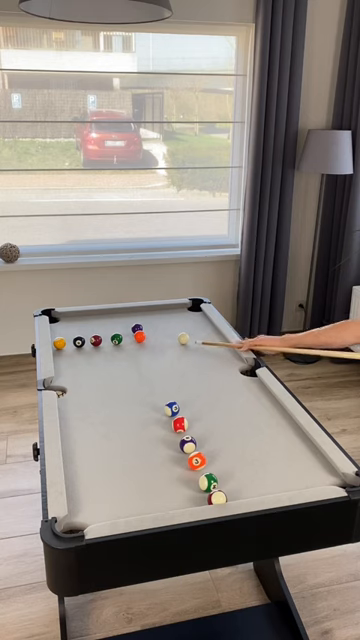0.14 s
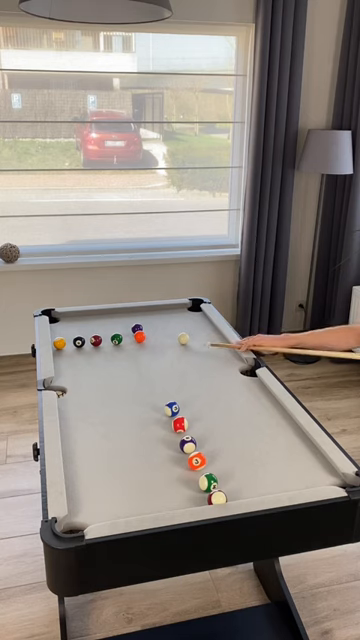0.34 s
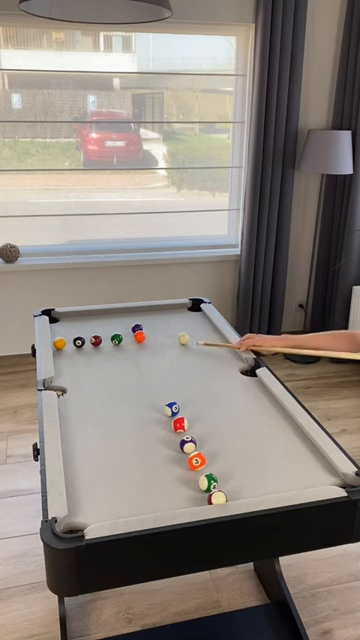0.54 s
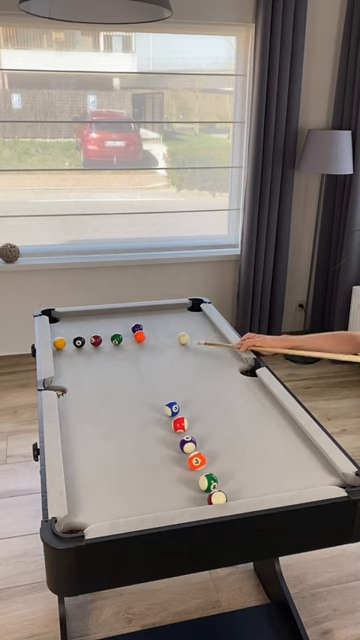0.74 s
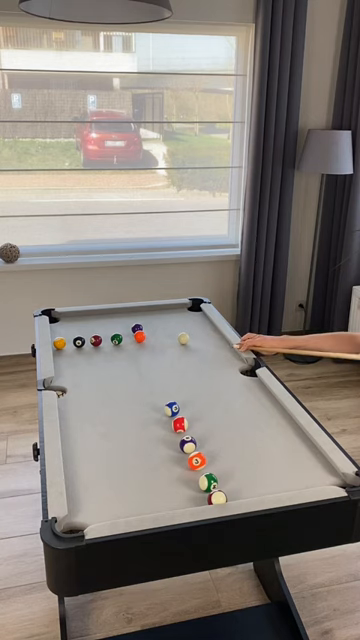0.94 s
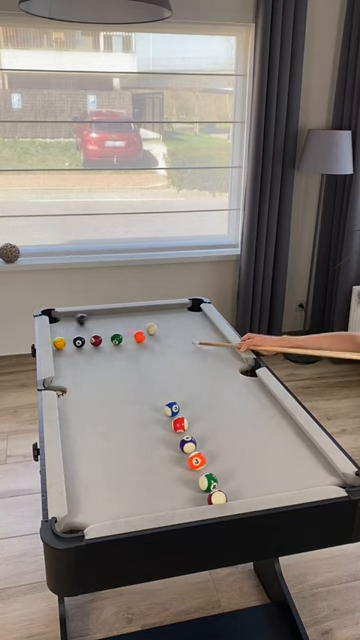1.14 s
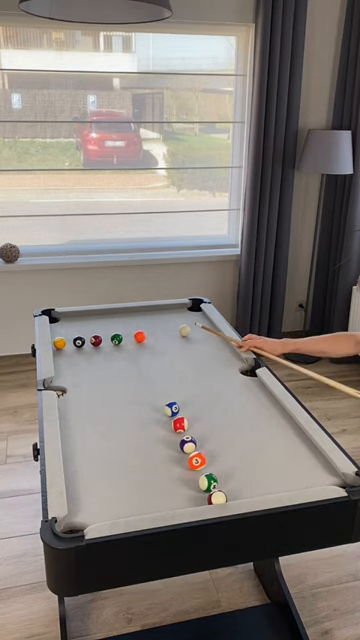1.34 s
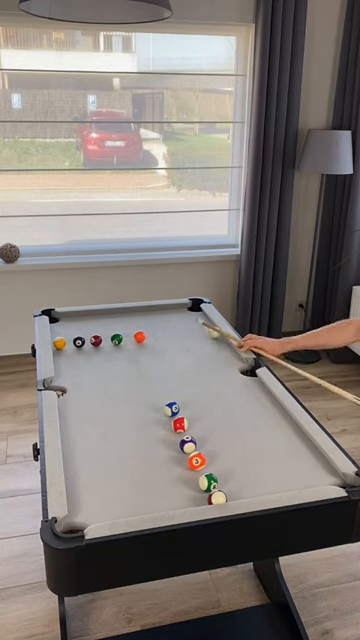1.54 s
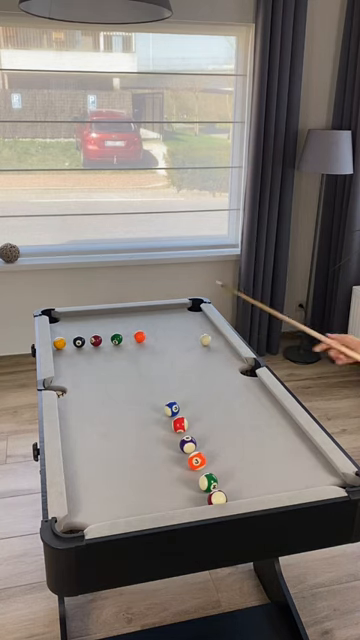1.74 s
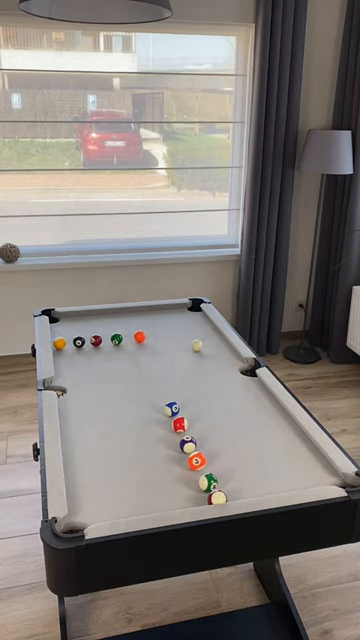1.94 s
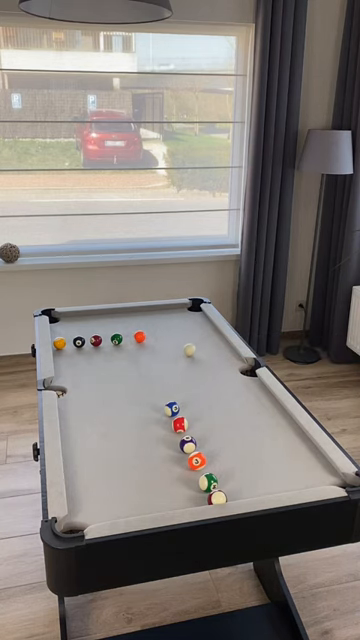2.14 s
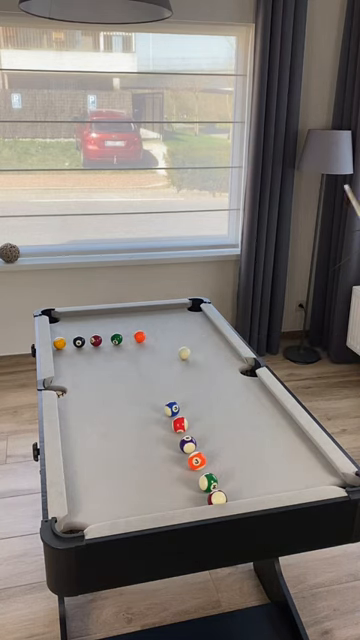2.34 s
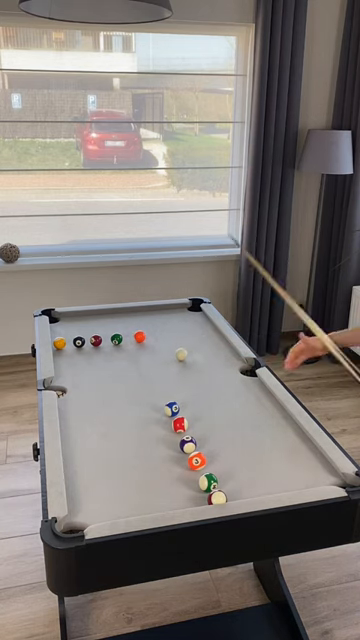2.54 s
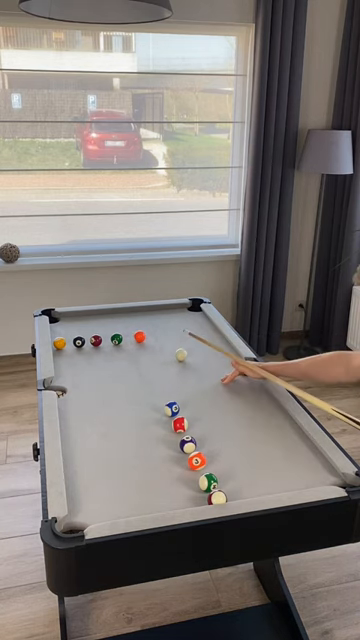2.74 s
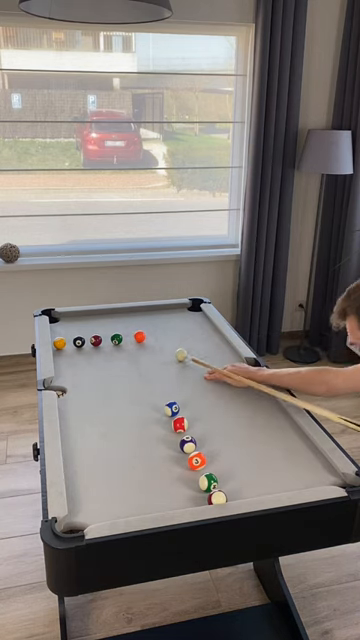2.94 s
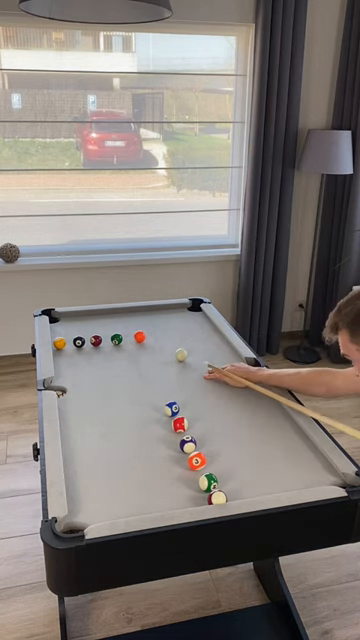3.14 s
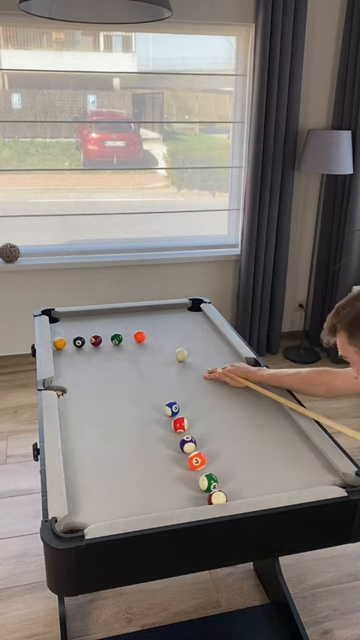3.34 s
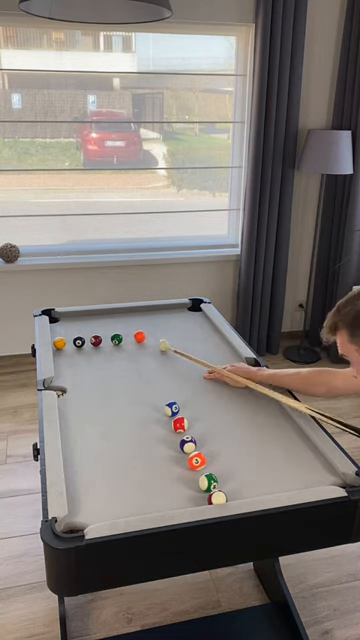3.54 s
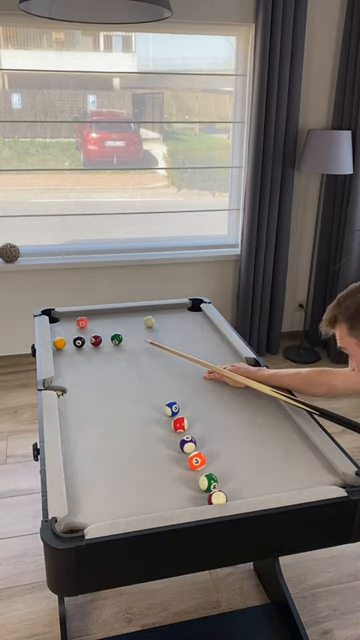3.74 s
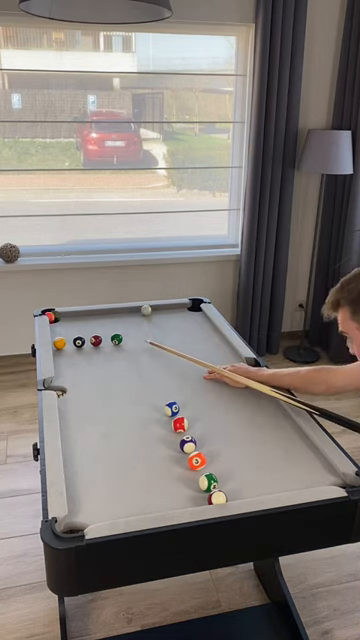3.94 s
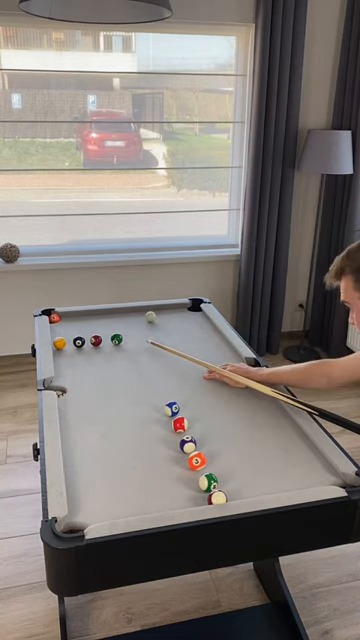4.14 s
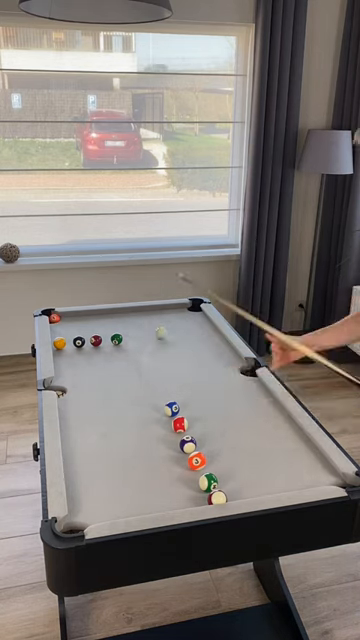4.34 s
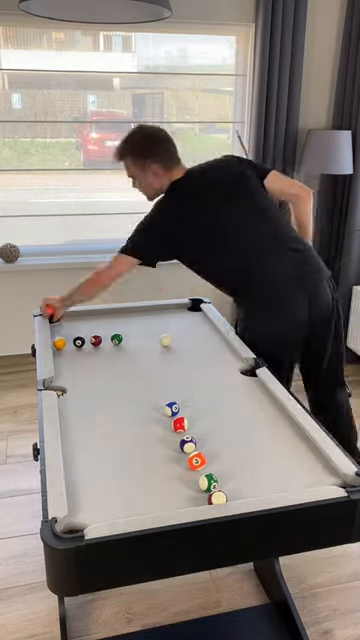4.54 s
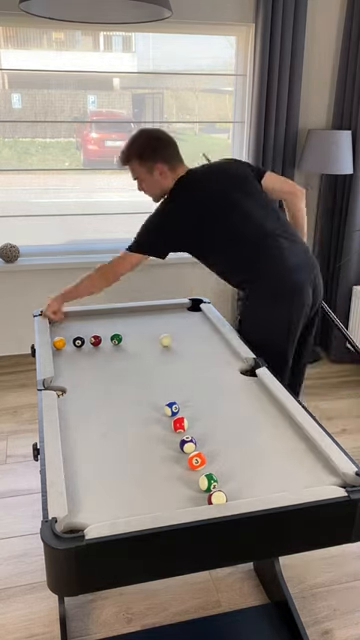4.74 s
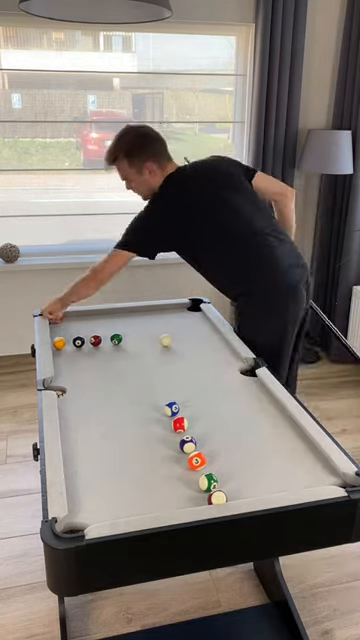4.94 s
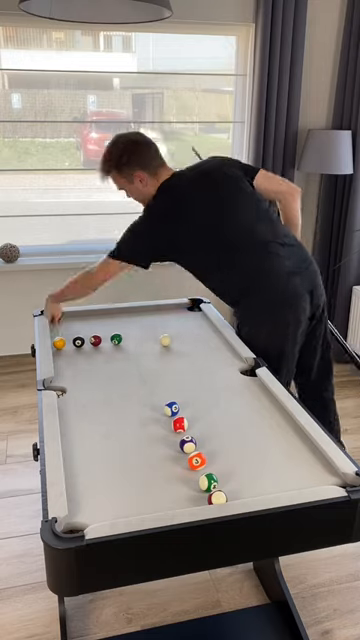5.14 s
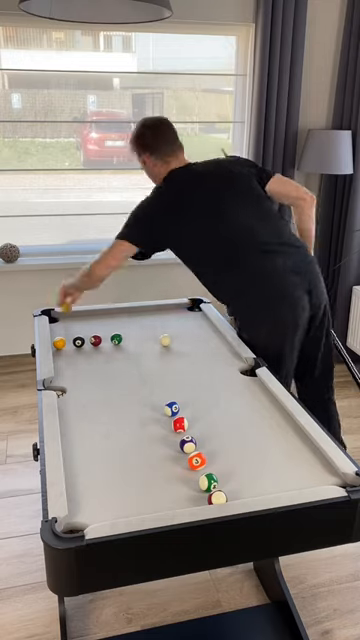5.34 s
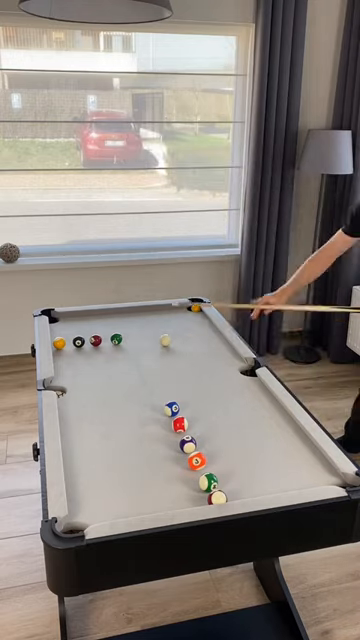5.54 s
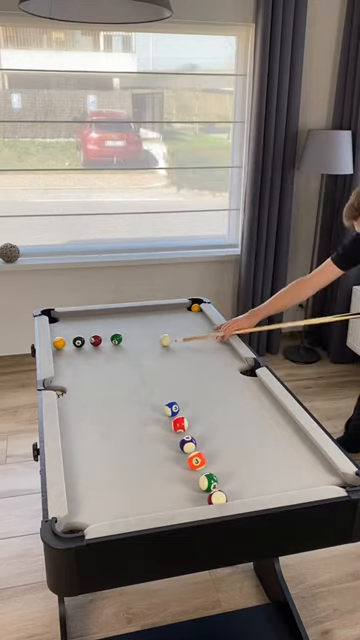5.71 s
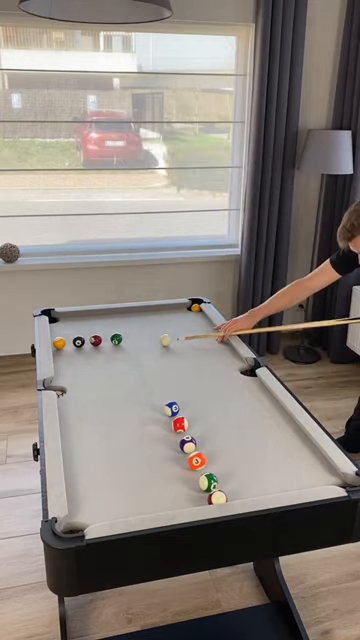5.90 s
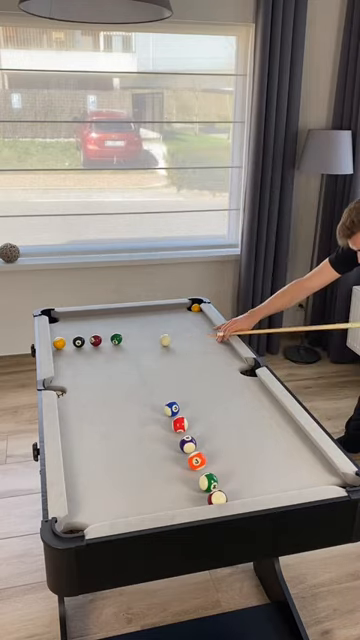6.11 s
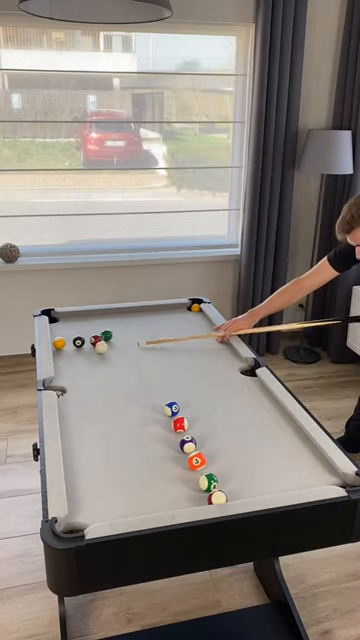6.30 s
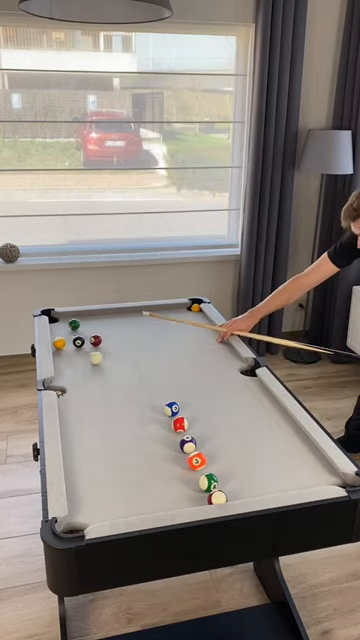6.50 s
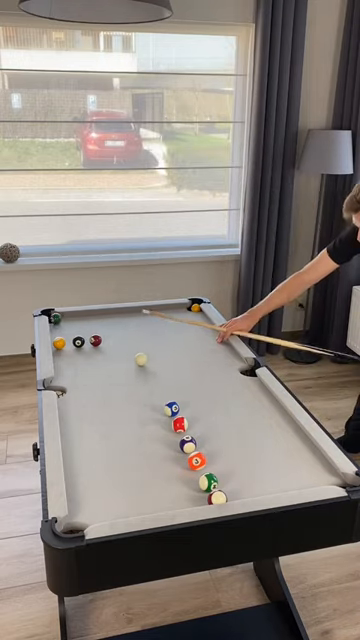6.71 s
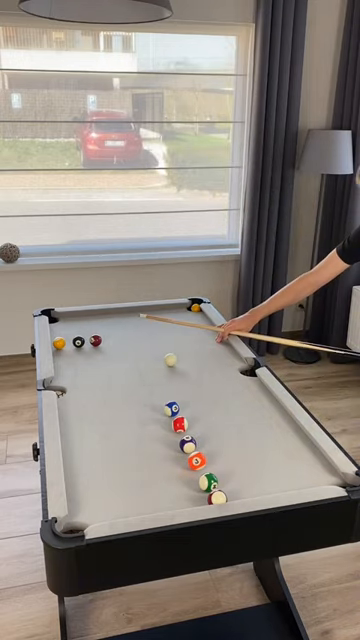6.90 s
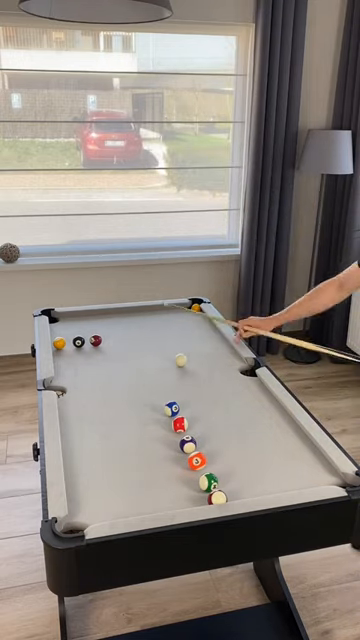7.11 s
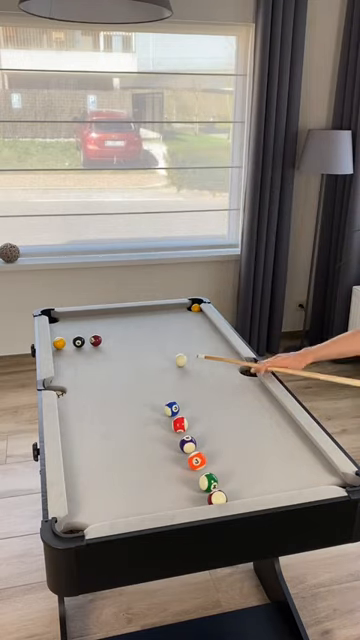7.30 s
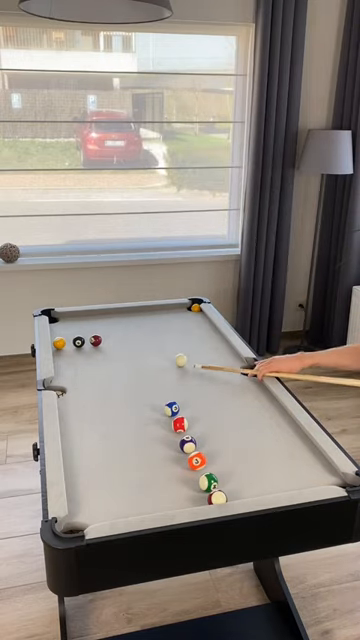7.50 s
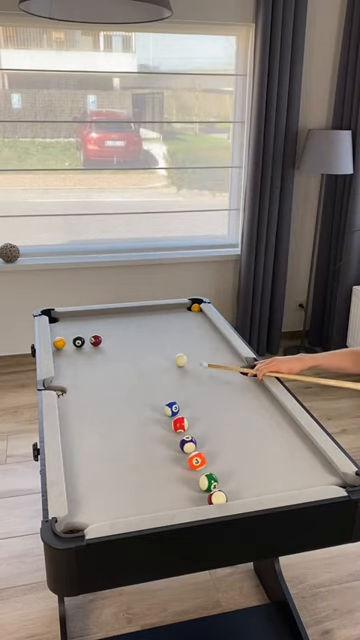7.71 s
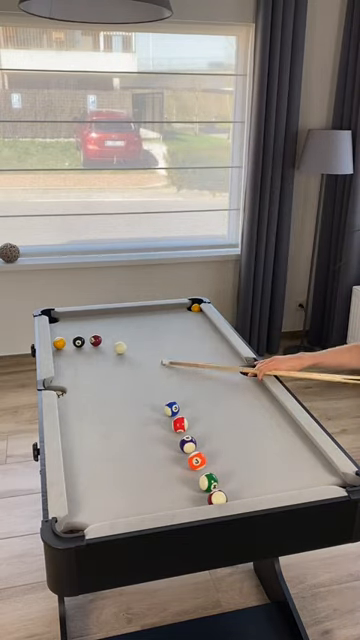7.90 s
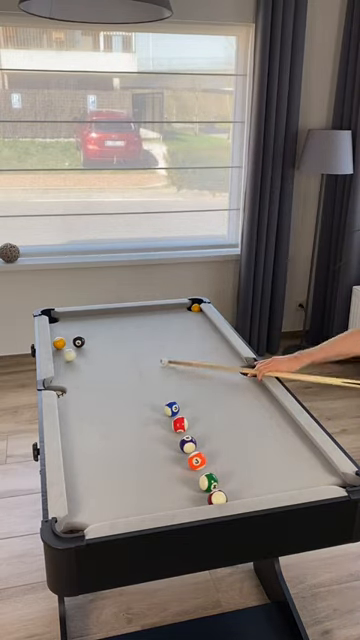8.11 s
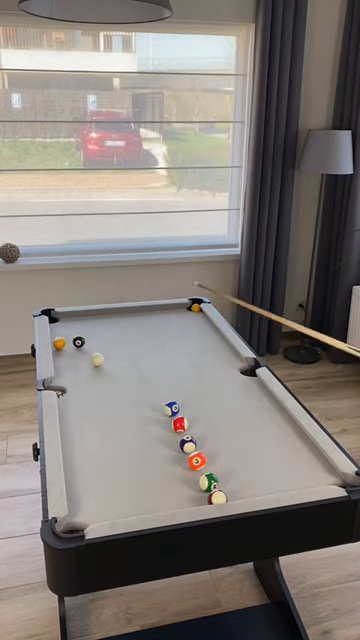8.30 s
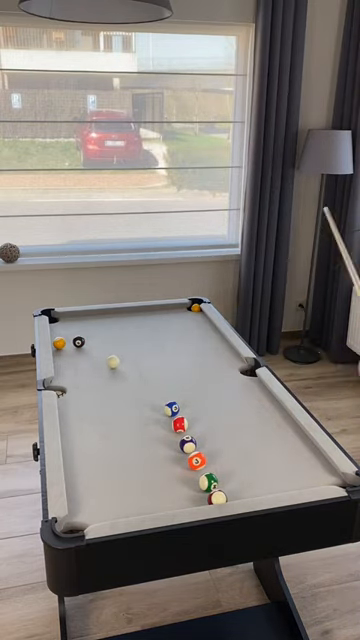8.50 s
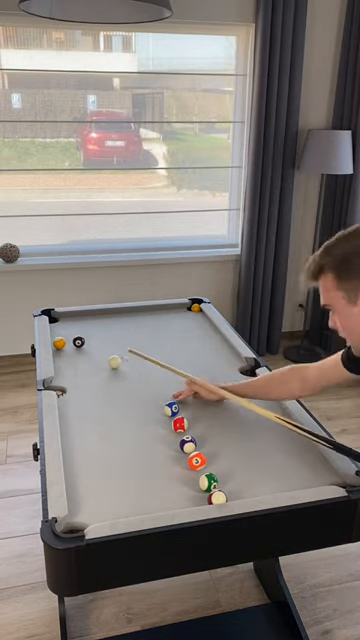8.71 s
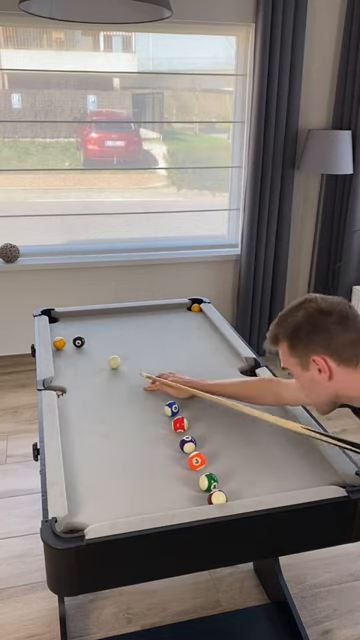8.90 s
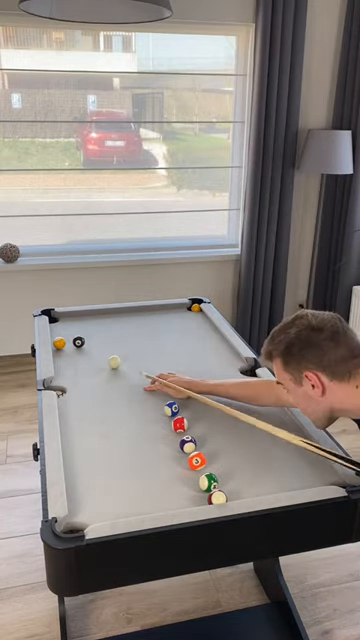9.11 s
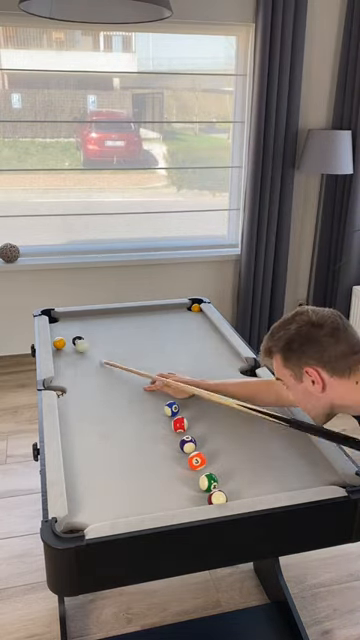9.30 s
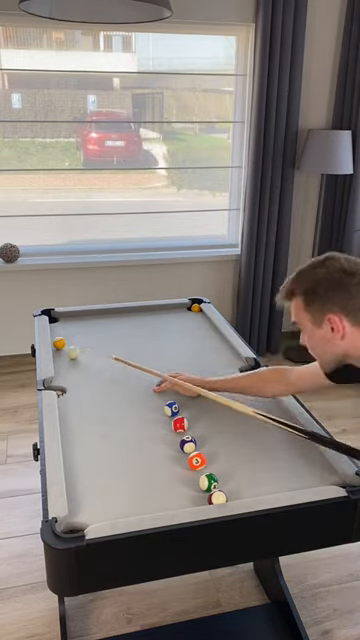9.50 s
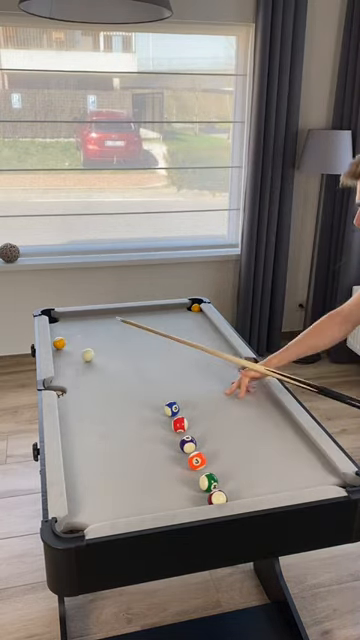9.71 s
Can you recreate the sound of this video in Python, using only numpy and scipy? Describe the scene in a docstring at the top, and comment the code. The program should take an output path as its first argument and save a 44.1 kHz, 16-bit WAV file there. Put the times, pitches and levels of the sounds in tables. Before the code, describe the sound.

In a quiet, slightly echoing home room, wooden cue hits, hard ball clacks and hollow pocket knocks come in short clusters separated by soft sleeve rustle and shoe scuffs. Midway, time races: the bass vanishes, a pitched hum rises and balls click brightly. Then normal low room tone and three shots, the first softer and duller. Clear, near stereo microphone.

```python
"""A cue slides over the hand, then knocks a ball: two shots on a small pool table in a living room.
Filtered noise rings make balls clack and pockets and frame knock; shaped friction noise makes clothes and shoes.
From 4.3 to 5.5 s time runs fast: a higher hum replaces the room's hum and rumble, and balls handled
in a pocket give short, bright clicks. The low room tone returns, clothes rustle, and three more shots follow."""
import sys
import numpy as np
from scipy import signal
from scipy.fft import rfft, irfft, next_fast_len
from scipy.io import wavfile
from scipy.ndimage import uniform_filter1d

SR = 44100
rng = np.random.default_rng(int(sys.argv[2]) if len(sys.argv) > 2 else 0)


def master_out(mix):
    """Clip the mix to full scale and print it as 16-bit PCM to the path in sys.argv[1]."""
    frames = np.transpose(np.atleast_2d(mix))
    ceiling = np.clip(frames, -1, 1)
    pcm = np.round(ceiling * 32767).astype(np.int16)
    wavfile.write(sys.argv[1], SR, pcm)


N = 429975
T = np.arange(N) / SR  # s

# Every blow has a ring from the room and a direct crack; ring_factor scales how long the room rings.
# cue on the white ball: (start_s, ring_db, crack_db, bright_hz, ring_factor)
CUE_HITS = [(1.067, -12.5, 3.5, 8940, 1.42), (3.523, -17.5, 3.5, 5090, 1.27),
            (6.336, -21.5, -8.5, 1404, 0.58), (8.023, -14, -3.5, 3160, 0.56),
            (9.4303, -15.5, 2.5, 5060, 0.41)]
# ball against ball: (start_s, ring_db, crack_db, ring_factor)
BALL_HITS = [(1.099, -10.5, -32, 1.05), (1.304, -18.5, -32, 1.29), (1.43, -31, -51, 0.89),
             (3.5956, -18, 0, 1.11), (3.902, -14.5, -0.5, 1.05), (3.928, -16.5, -23, 0.47),
             (6.382, -21, -3, 0.43), (8.072, -13, -31, 0.29), (8.080, -29, 2.5, 0.76),
             (8.238, -13, 0.5, 0.48), (8.282, -20, -22, 0.61), (9.457, -19, -1, 0.52),
             (9.5556, -21, -2.5, 0.42), (9.568, -18, -28, 0.8)]
# knocks on the pockets and the frame: (start_s, ring_db, crack_db, bright_hz, ring_factor)
POCKET_HITS = [(1.22, -9.5, 1.5, 11700, 0.62), (1.229, -12, -24, 1860, 0.7),
               (1.246, -11, -23.5, 1600, 0.57), (2.421, -55, -58, 895, 0.79),
               (3.93, -12.5, -28, 8200, 0.46), (4.023, -13.5, -6, 1540, 0.35),
               (6.3357, -25.5, -10, 1204, 0.24), (4.059, -18.5, -32, 860, 0.51),
               (8.223, -26, -24, 11040, 0.41), (8.229, -31.5, -10, 1500, 0.74),
               (8.337, -42, -44, 890, 0.21), (9.5394, -20, -17, 900, 0.68), (9.675, -43, -44, 790, 0.42),
               (5.92, -57.5, -51, 6000, 0.39), (9.15, -56.5, -55, 6030, 0.33)]
# dull thuds of the table bed, cushions and feet: (start_s, ring_db, push_db, pitch_hz, ring_factor)
THUD_HITS = [(1.584, -34.5, -46, 129.5, 0.97), (1.62, -36, -46.5, 173, 0.51), (2.478, -16, -16.5, 77, 0.48),
             (2.491, -28.5, -31, 147, 1.1), (2.575, -42, -30, 74, 0.89), (3.30, -46, -44, 105.7, 0.4),
             (3.529, -22, -25.5, 139, 1.6), (3.939, -18, -23, 221.6, 0.79), (4.039, -23, -35, 150, 1.46),
             (6.513, -20.5, -18, 179, 0.62), (6.94, -35, -40, 146, 2.6), (7.31, -46.5, -45, 94, 1.6),
             (8.03, -26, -26.5, 170, 0.36), (8.235, -27, -19, 225, 0.36), (8.699, -27, -33, 74.2, 0.5),
             (8.715, -42.5, -35, 162, 0.82), (9.435, -19.5, -18, 189, 0.23), (9.555, -26.5, -16, 252, 0.56)]
# balls handled while time runs fast: (start_s, ring_db, crack_db, bright_hz, ring_factor)
FAST_CLICKS = [(4.304, -39, -44, 11700, 2.9), (4.465, -28.5, -44, 3700, 0.52),
               (4.543, -27, -29, 10000, 0.75), (4.6275, -8.5, 1.5, 10400, 1.17),
               (4.651, -24, -7, 11590, 2.2), (4.659, -12, -11, 9000, 0.84), (4.8456, -12, -15, 16000, 1.3),
               (4.86, -14, 0, 14300, 1.1), (4.903, -31, -34, 12000, 2.4), (4.971, -27, -29.5, 3070, 0.77),
               (5.0264, -2, -10, 10800, 0.46), (5.044, -15, -7.5, 11500, 1.13),
               (5.10, -39.5, -46, 9000, 5.3), (5.215, -33, -29, 9030, 1.5), (5.236, -30.5, -17, 4200, 2.8),
               (5.326, -33, -24, 5100, 0.8), (5.391, -23.5, -13, 10400, 0.99),
               (5.4258, -20.5, -6, 8000, 0.62), (5.430, -10, -1, 6900, 0.77)]
# knocks on the frame while time runs fast: (start_s, ring_db, crack_db, bright_hz, ring_factor)
FAST_BUMPS = [(4.301, -39, -25.5, 1210, 0.45), (4.400, -19.5, -9, 1070, 0.4),
              (4.548, -25.5, -29.5, 1400, 0.69)]

# broad colour of the cue, the balls, the pocket, the fast clicks and the fast bumps: (freq_hz, level_db)
CUE_COLOUR = [(40, -23), (100, -13), (170, 0.5), (400, -5), (1000, -7.5), (1800, -8.5), (2700, -6.5),
              (5000, -12), (9000, -15.5), (16000, -18)]
BALL_COLOUR = [(40, -25.5), (140, -8.5), (230, -5.5), (450, -18), (1000, -15), (1600, -5.5), (2500, 0),
               (3700, -5), (5000, -9), (8000, -32), (16000, -26.5)]
POCKET_COLOUR = [(40, -23), (100, -16), (220, -2.5), (380, -6), (650, 0), (1300, -1), (2200, -7.5),
                 (4500, -15.5), (8000, -17.5), (16000, -18)]
CLICK_COLOUR = [(100, -46), (280, -37.5), (420, -14.5), (800, -8), (1300, -2.5), (3000, -0.5), (5200, 1),
                (6500, -0.5), (11000, 1.5), (16000, 3)]
BUMP_COLOUR = [(120, -38), (250, -20.5), (390, 0.5), (800, -14), (1200, -18.5), (2000, -24.5), (16000, -38)]
# broad colour of a thud, which moves with its pitch: (multiple_of_pitch, level_db)
THUD_COLOUR = [(.2, -26), (.6, -4.5), (1, 11), (1.5, -2), (3, -18.5), (6, -33), (12, -62), (60, -78)]

# resonances of the shaft, the balls, the hollow frame, the pocket and the bumped frame:
# (freq_hz, width_hz, lift_db)
CUE_RESONANCES = [(706, 49, 7), (957, 29, 12.2), (1015, 27, 5), (1264, 45, 13), (1548, 55, 13),
                  (3260, 48, 3), (2096, 37, 8.5), (2360, 50, 3.4), (2760, 70, 7.1), (4060, 42, 6.5)]
BALL_RESONANCES = [(1240, 32, 5), (2480, 120, 5.1), (2757, 71, 3.9), (3058, 70, 5.5), (3330, 25, 1.3),
                   (3790, 170, 6.1), (4670, 85, 2.2)]
FRAME_RESONANCES = [(264, 20, 7), (329, 14, 4.6), (369, 32, 7.3), (440, 16, 7.7), (582, 73, 6.3),
                    (660, 33, 7.6), (953, 35, 3.9), (1154, 18, 3.7), (1366, 40, 2.2)]
POCKET_RESONANCES = [(1230, 53, 4.9), (1624, 60, 8), (1920, 60, 4.7), (2470, 70, 5.9), (3410, 44, 8.8),
                     (5100, 150, 9.8)]
BUMP_RESONANCES = [(384, 24, 9.5), (638.3, 57, 8.5)]

# decay of the room in each band, before each blow's own length factor: (freq_hz, t60_s)
ROOM_DECAY = [(60, 0.22), (150, 0.24), (300, .4), (700, 0.43), (1500, 0.37), (2800, 0.34), (5000, 0.29),
              (8000, 0.25), (16000, .19)]
# likeness of left and right, one being identical: (freq_hz, correlation)
STEREO_LIKENESS = [(50, 1), (125, 0.6), (250, 0.37), (500, 0.27), (2500, 0.26), (12000, .03)]

# the cue slides over the hand: (start_s, length_s, rub_db, hiss_db)
CUE_SLIDES = [(0.0, 0.045, -32.5, -39), (0.014, 0.14, -37, -53), (0.135, 0.04, -41.5, -44),
              (0.187, 0.062, -40.5, -46.5), (0.256, 0.059, -39, -36.5), (0.272, 0.094, -43.5, -52),
              (0.863, 0.19, -58.5, -72), (0.978, 0.074, -47, -66), (6.543, 0.037, -63, -64.5),
              (7.839, 0.044, -56, -65.5), (7.947, .07, -56.5, -76)]
# clothes brush as an arm moves: (start_s, length_s, swish_db, hiss_db)
CLOTH_BRUSHES = [(1.61, 0.13, -64, -60), (1.723, 0.18, -69, -48.5), (1.916, 0.14, -59, -46.5),
                 (1.998, 0.18, -45.5, -48), (2.238, 0.072, -56, -51.5), (2.488, 0.027, -41, -69),
                 (2.514, 0.099, -54.5, -57), (2.573, 0.097, -46, -47), (2.623, 0.43, -66.5, -59),
                 (3.061, 0.2, -78, -65), (3.389, 0.18, -70.5, -55), (5.532, .2, -59, -52.5),
                 (5.593, 0.06, -44.5, -52.5), (6.928, 0.016, -50, -56), (6.963, 0.081, -57.5, -70),
                 (7.045, 0.05, -56, -51), (7.104, 0.22, -66, -60.5), (7.2, 0.064, -50, -50),
                 (7.276, .12, -59, -42.5), (8.38, 0.14, -65, -52), (8.449, 0.061, -45, -49),
                 (8.687, 0.071, -55.5, -58), (8.76, 0.26, -53.5, -54.5), (8.963, 0.19, -69, -58),
                 (9.717, 0.1, -48.5, -50)]
# shoes scuff the floor: (start_s, length_s, level_db)
SHOE_SCUFFS = [(2.397, .06, -51.5), (2.491, .05, -42), (2.53, .14, -60), (2.748, 0.34, -48),
               (5.565, 0.16, -59.5), (5.765, 0.062, -51.5), (6.92, 0.047, -39), (6.973, .07, -48),
               (7.04, 0.24, -54), (7.4, .2, -61.5), (8.703, 0.031, -44.5), (8.8, 0.26, -51.5),
               (8.884, 0.059, -46.5), (9.685, 0.067, -46.5)]
# colour of the shaft's rub and hiss, the sleeve's swish, the weave's hiss and the soles: (freq_hz, level_db)
RUB_COLOUR = [(120, -23.5), (250, -5), (390, 1), (550, -7), (1050, -7.5), (1700, -13), (3000, -16.5),
              (5000, -37.5)]
SLIDE_HISS_COLOUR = [(2000, -11), (3500, 2), (5000, 5), (6300, -9.5), (8000, -27.5), (12000, -33),
                     (16000, -40)]
SWISH_COLOUR = [(600, -26.5), (1100, -4), (1600, -2), (2500, -3.5), (3500, -7), (7000, -21.5)]
WEAVE_COLOUR = [(1000, -20), (3000, -5), (5000, -3.5), (7500, 1), (9000, -6.5), (12000, 2), (16000, -16.5)]
SCUFF_COLOUR = [(150, -2), (380, 3.5), (800, -1.5), (1200, -7), (1700, -13), (5000, -23)]

# colour of the room's hum, its low rumble and the raised hum: (freq_hz, level_db)
HUM_COLOUR = [(12, -30), (25, -11.5), (50, -10.5), (96, -16), (135, -9.5), (270, -17.5), (400, -25),
              (800, -31), (1400, -37), (2500, -39.5), (5000, -41.5), (13000, -46.5), (16000, -60.5)]
LOW_RUMBLE_COLOUR = [(15, -10.5), (35, 1.5), (70, -3), (135, -4), (220, -20), (500, -51.5), (2000, -90)]
RAISED_COLOUR = [(100, -46), (170, -44.5), (230, -24), (320, -7.5), (400, 1), (520, -0.5), (700, -11),
                 (1030, -6), (1400, -18.5), (1750, -15.5), (2800, -26.5), (5200, -34.5), (16000, -40)]
# resonances of the raised hum: (freq_hz, width_hz, lift_db)
RAISED_RESONANCES = [(370.8, 12, 10), (435.8, 7, 11.5), (646, 41, 2.5), (1185, 30, 6), (1550, 60, 4.5),
                     (2050, 50, 6)]
# level of the raised hum: (time_s, level_db)
RAISED_LEVEL = [(4.28, -40), (4.5, -34), (4.8, -38), (5.2, -41), (5.42, -34.5), (5.51, -35)]

FAST_FROM_S, FAST_TO_S, SPEED = 4.277, 5.515, 4.27  # SPEED in times normal
CLACK_HZ, CLACK_DB_PER_OCTAVE = 5940, 27.5  # brightness of a clack at 0 dB; it halves for so many dB less
CRACK_OVER_RING_DB = 13  # a crack this far above its ring carries as much energy
# a stroke speeds up and slows down in one arch; its friction noise follows the speed
STROKE_SKEW, LOUDNESS_POWER = 0.55, 0.95  # skew under one puts the fastest moment early; gain = speed ** power
LINGER_S = 0.0081  # time constant with which the room lets the power of a stroke fade
HUM_DB, RUMBLE_DB, RUMBLE_WAVER_DB = -53.5, -58, 5  # the waver is how much the rumble comes and goes
FAST_TONE_HZ, FAST_TONE_DB = 437, -6.5  # the raised hum's one clear line, against the rest of it
EDGE_HZ = 16000  # top of the whole sound


def cue_strokes():
    """The tip knocks the white ball and the wooden shaft rings."""
    out = np.zeros((2, N))
    for s, ring_db, crack_db, bright_hz, factor in CUE_HITS:
        shaft = body(CUE_COLOUR, CUE_RESONANCES, bright_hz)
        out += blow(s, shaft, ring_db, crack_db, 0.64 * factor,
                    swell_s=0.015, swell_db=5.5, scatter_s=0.0036, scatter_db=-8)
    return out


def ball_clacks():
    """Hard balls touch for a fraction of a millisecond: a crack near 3 kHz, brighter when harder."""
    out = np.zeros((2, N))
    for s, ring_db, crack_db, factor in BALL_HITS:
        force_db = max(crack_db, ring_db + CRACK_OVER_RING_DB)
        bright_hz = CLACK_HZ * 2 ** (force_db / CLACK_DB_PER_OCTAVE)
        ball = body(BALL_COLOUR, BALL_RESONANCES, bright_hz)
        out += blow(s, ball, ring_db, crack_db, 0.82 * factor,
                    swell_s=0.012, swell_db=-1.5, scatter_s=0.0021, scatter_db=-6.0)
    return out


def pocket_knocks():
    """A ball hits the pocket and the hollow frame booms."""
    out = np.zeros((2, N))
    for s, ring_db, crack_db, bright_hz, factor in POCKET_HITS:
        frame = body(POCKET_COLOUR, FRAME_RESONANCES, bright_hz)
        out += blow(s, frame, ring_db, crack_db, 1.51 * factor,
                    swell_s=0.0099, swell_db=0.0, scatter_s=0.0015, scatter_db=-25)
    return out


def thuds():
    """Soft, slow contacts push only the low end of the table or the floor."""
    out = np.zeros((2, N))
    for s, ring_db, push_db, pitch_hz, factor in THUD_HITS:
        colour = [(multiple * pitch_hz, db) for multiple, db in THUD_COLOUR]
        out += blow(s, body(colour, [], 5000), ring_db, push_db, 0.75 * factor,
                    swell_s=0.008, swell_db=-6.5, scatter_s=0.006, scatter_db=-38.5)
    return out


def fast_handling():
    """Balls click and bump in the pocket; at high speed the room rings shorter and the bass is gone."""
    detunes = rng.uniform(0.95, 1.05, len(FAST_CLICKS))
    out = np.zeros((2, N))
    for (s, ring_db, crack_db, bright_hz, factor), detune in zip(FAST_CLICKS, detunes):
        # each ball lands on another spot, which shifts the pocket's ring a little
        modes = [(hz * detune, width, db) for hz, width, db in POCKET_RESONANCES]
        pocket = body(CLICK_COLOUR, modes, bright_hz)
        out += blow(s, pocket, ring_db, crack_db, 1.13 * factor / SPEED,
                    swell_s=0.0027, swell_db=-23.5, scatter_s=0.0037, scatter_db=-6.0)
    for s, ring_db, crack_db, bright_hz, factor in FAST_BUMPS:
        frame = body(BUMP_COLOUR, BUMP_RESONANCES, bright_hz)
        out += blow(s, frame, ring_db, crack_db, 4.2 * factor / SPEED,
                    swell_s=0.0021, swell_db=0.0, scatter_s=0.004, scatter_db=-12.5)
    # at high speed even the lowest boom lies above the bass
    bass_cut = signal.butter(3, 240, "highpass", fs=SR, output="sos")
    return signal.sosfilt(bass_cut, overload(out))


def aiming():
    """The shaft slides over the hand: friction gives a woody rub and a narrow hiss."""
    s, length, rub_db, hiss_db = np.transpose(CUE_SLIDES)
    rub = rubbing(RUB_COLOUR, zip(s, length, rub_db), grain_db=0.0)
    hiss = rubbing(SLIDE_HISS_COLOUR, zip(s, length, hiss_db), grain_db=0.1)
    return rub + hiss


def clothes():
    """Each arm movement gives a soft swish of the sleeve and a fine hiss of the weave."""
    s, length, swish_db, hiss_db = np.transpose(CLOTH_BRUSHES)
    swish = rubbing(SWISH_COLOUR, zip(s, length, swish_db), grain_db=1.8)
    hiss = rubbing(WEAVE_COLOUR, zip(s, length, hiss_db), grain_db=1.0)
    return swish + hiss


def shoes():
    """Soles scuff the floor as the player changes place: friction noise in short strokes."""
    return rubbing(SCUFF_COLOUR, SHOE_SCUFFS, grain_db=2.0)


def background():
    """Low hum of the room over an uneven rumble; a higher hum takes their place while time runs fast."""
    is_fast = (T > FAST_FROM_S) & (T < FAST_TO_S)
    fast = uniform_filter1d(is_fast.astype(float), size=200)  # short crossfades
    hum = wash(HUM_COLOUR) * amp(HUM_DB + wavering(N, count=5000))
    rumble = wash(LOW_RUMBLE_COLOUR) * amp(RUMBLE_DB + RUMBLE_WAVER_DB * wavering(N, count=3000))
    raised = noise(body(RAISED_COLOUR, RAISED_RESONANCES, 20000), next_fast_len(N))[:, :N]
    raised *= amp(2.1 * wavering(N, count=1700))
    phase = 2 * np.pi * FAST_TONE_HZ * T + 0.66 * wavering(N, count=6000)
    raised += evened(np.sin(phase)) * amp(FAST_TONE_DB + 2.5 * wavering(N, count=4000))
    raised_gain = amp(np.interp(T, *np.transpose(RAISED_LEVEL)))
    return (hum + rumble) * (1 - fast) + raised * raised_gain * fast


def blow(s, colour, ring_db, crack_db, length, swell_s, swell_db, scatter_s, scatter_db):
    """The body's ring arrives directly, scattered off the table top and rails, and from the room."""
    out = np.zeros((2, N))
    direct = impulse(colour)
    lead, ring = room_ring(length, swell_s, swell_db)
    t = np.arange(len(direct)) / SR
    paths = amp(ring_db) * ring
    scatter = white(len(t)) * np.exp(-t / scatter_s)
    paths[:, lead:lead + len(t)] += amp(crack_db + scatter_db) * scatter
    paths[:, lead] += 0  # the direct path joins after the levelling below
    paths /= np.linalg.norm(direct)
    paths[:, lead] += amp(crack_db)
    add(out, s - lead / SR, signal.fftconvolve(paths, direct[None], axes=1))
    return out


def body(points, modes, bright_hz):
    """Colour of a struck body: broad shape, resonances, and less treble the longer the contact lasts."""
    def colour(hz):
        lift = 1
        for freq, width, db in modes:
            lift = lift + (amp(db) - 1) / (1 + (2 * (hz - freq) / width) ** 2)
        return amp(read(points, hz)) * lift / np.sqrt(1 + (hz / bright_hz) ** 4)
    return colour


def impulse(colour, size=8192):
    """The causal, minimum-phase ring of a body after one sharp blow, peak one."""
    hz = abs(np.fft.fftfreq(size, 1 / SR))
    log_gain = np.log(colour(hz) + 1e-5)
    spectrum = np.exp(np.conj(signal.hilbert(log_gain)))
    ring = np.fft.ifft(spectrum).real
    return ring / abs(ring).max()


def room_ring(length, swell_s, swell_db, lead=2646, size=32768):
    """Diffuse sound of one blow, with a brief swell leading into it over the lead; then every band dies at its
    own speed."""
    hz, t, bands = signal.stft(white(size), SR, nperseg=256)
    age = np.maximum(t - lead / SR, 0)
    t60 = length * read(ROOM_DECAY, hz)[:, None]
    ring = signal.istft(bands * amp(-60 * age / t60), SR, nperseg=256)[1]
    early = (lead - np.arange(lead)) / SR
    ring[:, :lead] *= amp(swell_db) * np.exp(-(early / swell_s) ** 2)
    return lead, ring


def rubbing(colour, strokes, grain_db):
    """Friction noise that catches and slips, swelling and fading with the speed of each stroke."""
    power = np.zeros((1, N))
    for s, length, db in strokes:
        progress = np.linspace(0, 1, round(length * SR), endpoint=False)
        speed = np.sin(np.pi * progress ** STROKE_SKEW)
        add(power, max(s, 0), (amp(db) * speed[None] ** LOUDNESS_POWER) ** 2)
    keep = np.exp(-1 / (LINGER_S * SR))
    power = signal.lfilter([1 - keep], [1, -keep], power + 1e-20)
    grain = evened(amp(grain_db * wavering(N, count=500)))
    return wash(colour) * grain * np.sqrt(power)


def overload(x):
    """Rounds off the peaks that come near full scale."""
    return x / (1 + x ** 6) ** (1 / 6)


def noise(colour, size):
    """Stereo noise of rms one; its bass is nearly alike on both sides."""
    hz = np.fft.rfftfreq(size, 1 / SR)
    left, other = rfft(rng.standard_normal((2, size)))
    same = np.clip(read(STEREO_LIKENESS, hz), -1, 1)
    right = same * left + np.sqrt(1 - same ** 2) * other
    return evened(irfft(np.array([left, right]) * colour(hz), size))


def wash(points):
    """Steady noise with the given spectrum."""
    return noise(lambda hz: amp(read(points, hz)), next_fast_len(N))[:, :N]


def white(size):
    """Stereo noise with a flat spectrum."""
    return noise(np.ones_like, size)


def wavering(size, count):
    """Smooth chance of rms one that changes about every count samples."""
    smooth = uniform_filter1d(rng.standard_normal(size), count)
    return evened(uniform_filter1d(smooth, count // 2))


def amp(db):
    """Decibels to gain."""
    return 10 ** (np.asarray(db) / 20)


def evened(x):
    """Scales to an rms of one."""
    return x / np.sqrt(np.mean(x ** 2) + 1e-20)


def read(points, hz):
    """Joins the points by straight lines on a log-frequency axis."""
    freq, value = np.transpose(points)
    return np.interp(np.log(np.maximum(hz, 1)), np.log(freq), value)


def add(mix, s, sound):
    """Mixes a sound in at time s, cut off at the end of the mix."""
    part = mix[:, round(s * SR):][:, :sound.shape[1]]
    part += sound[:, :part.shape[1]]


def scene():
    """All sources together, the blows close to the middle."""
    # side gains in dB: left, right
    shots = cue_strokes() * amp([[-0.3], [0.3]])
    shots += ball_clacks() * amp([[0.6], [-0.6]])
    shots += pocket_knocks()
    shots += thuds() * amp([[-1.2], [1.2]])
    player = aiming() + clothes() + shoes()
    return shots + fast_handling() + player + background()


def record(dry):
    """The loudest cracks overload softly; then the band limit."""
    band_limit = signal.firwin(511, EDGE_HZ, window=("kaiser", 8), fs=SR)
    return signal.oaconvolve(overload(dry), band_limit[None], "same")


dry = scene()
out = record(dry)
master_out(out)
```